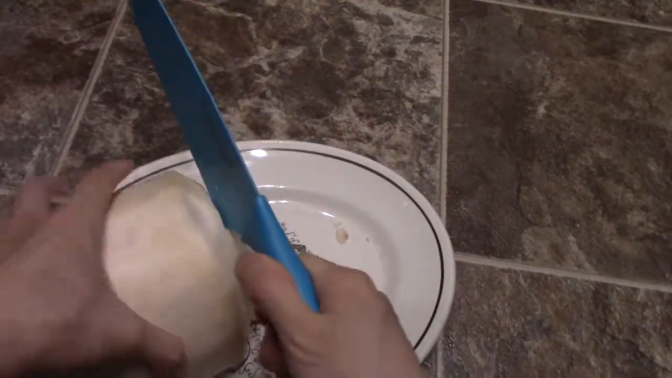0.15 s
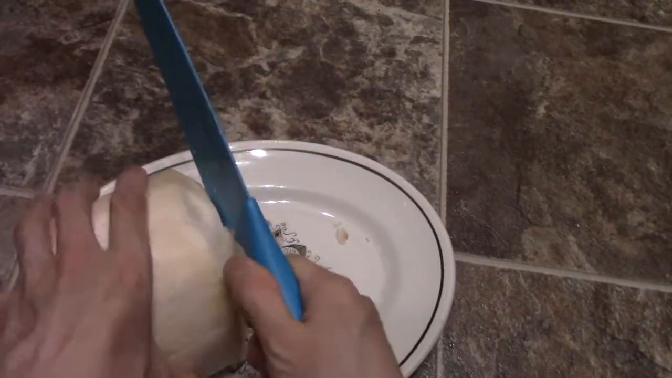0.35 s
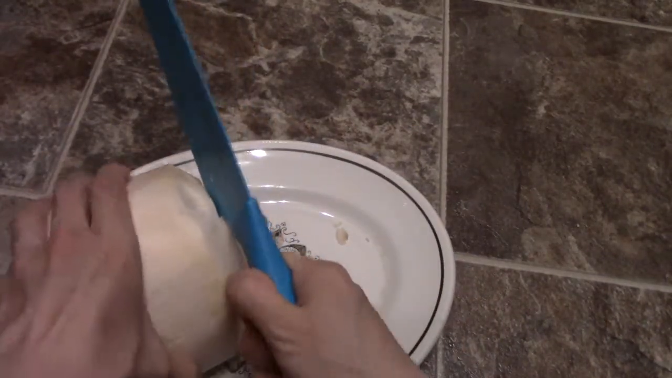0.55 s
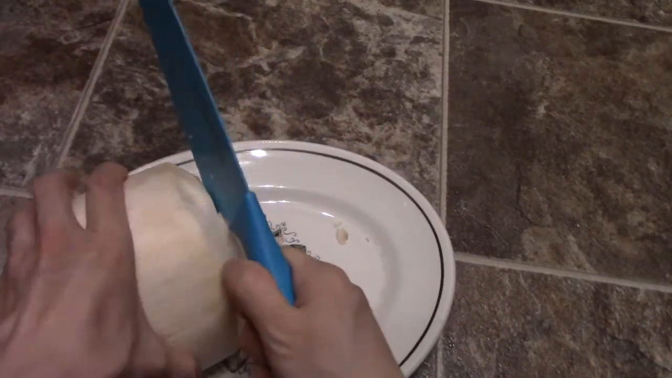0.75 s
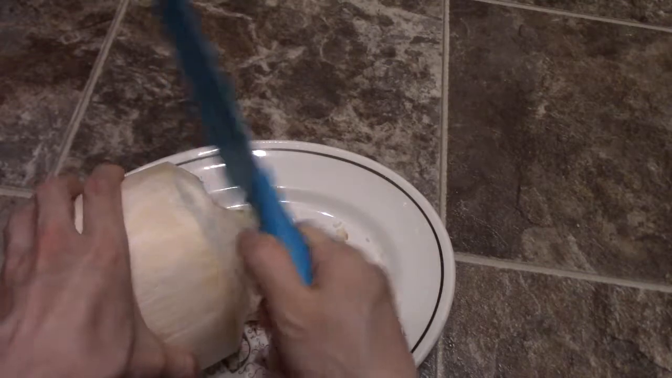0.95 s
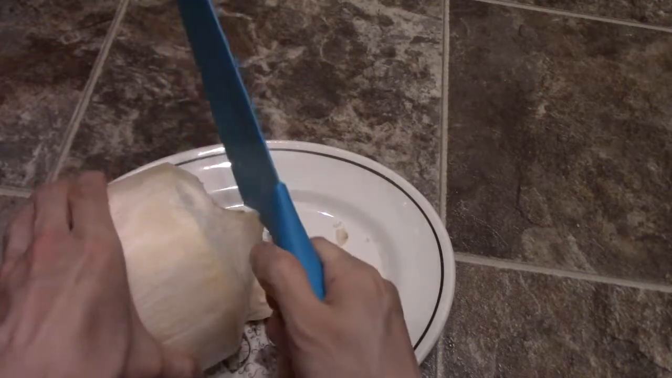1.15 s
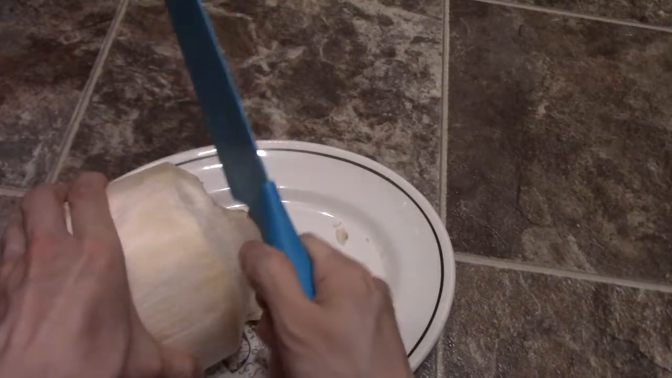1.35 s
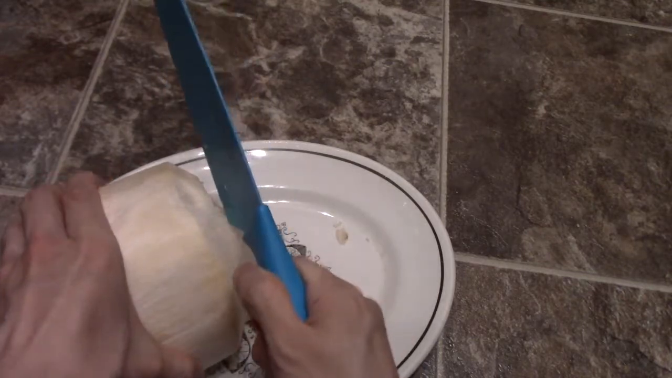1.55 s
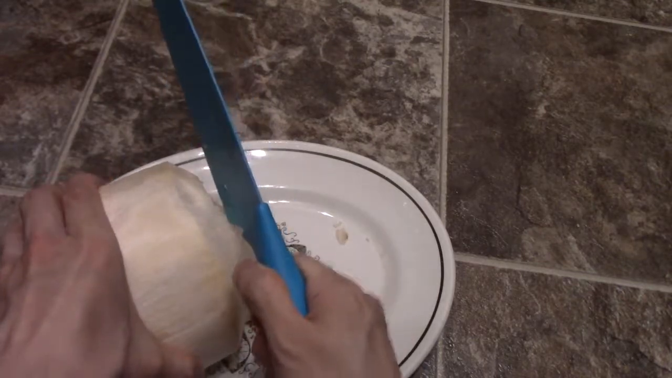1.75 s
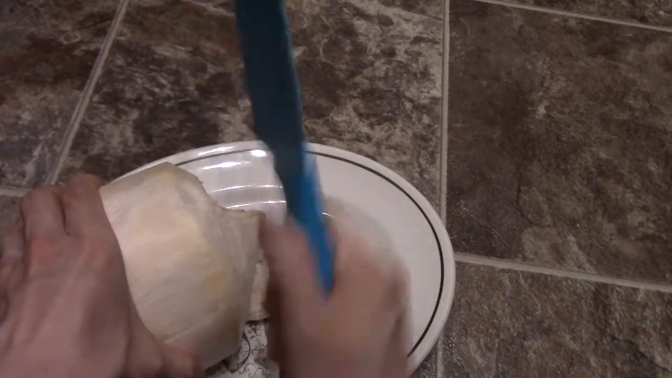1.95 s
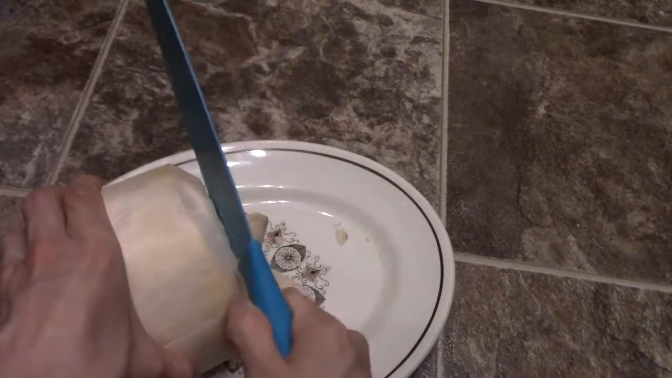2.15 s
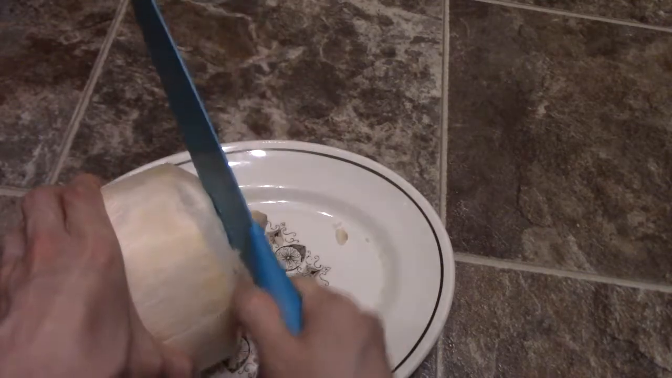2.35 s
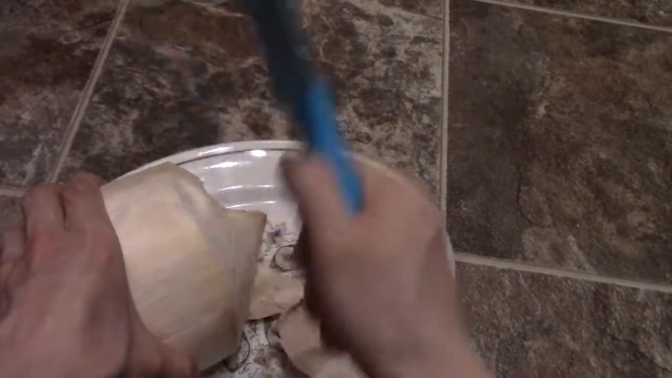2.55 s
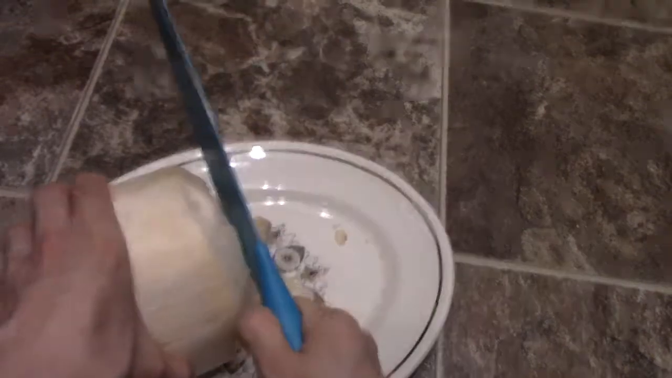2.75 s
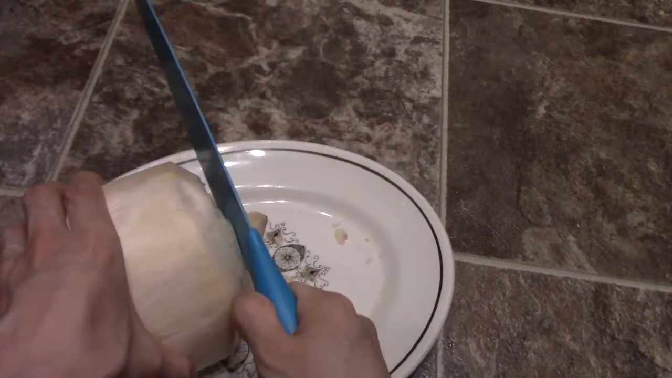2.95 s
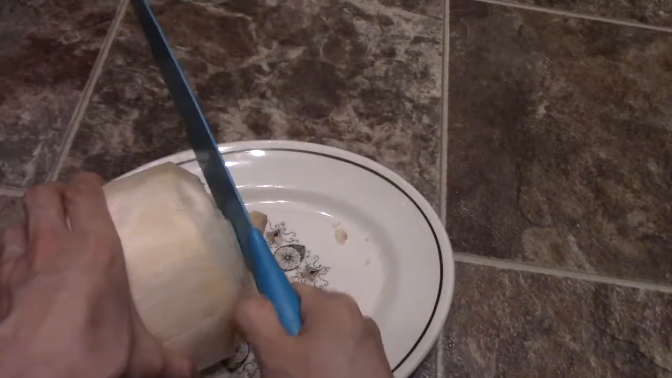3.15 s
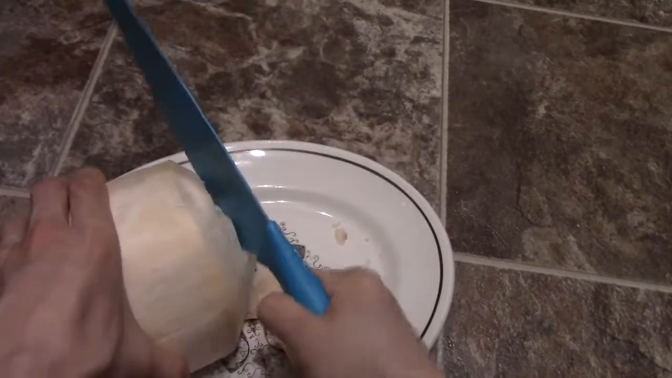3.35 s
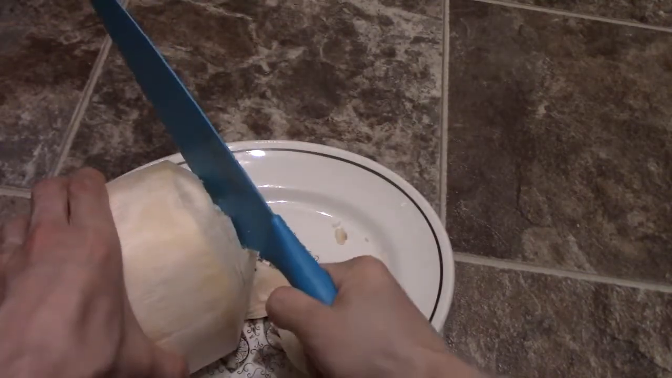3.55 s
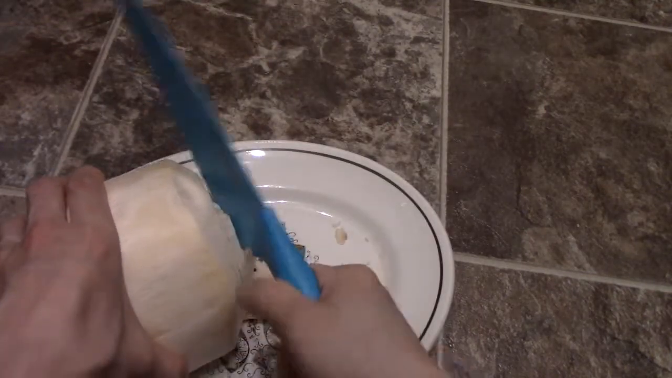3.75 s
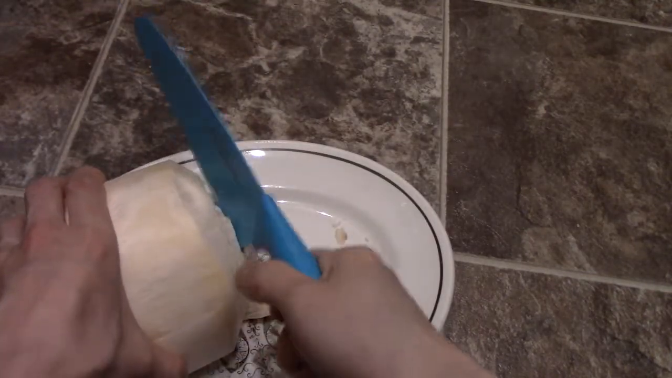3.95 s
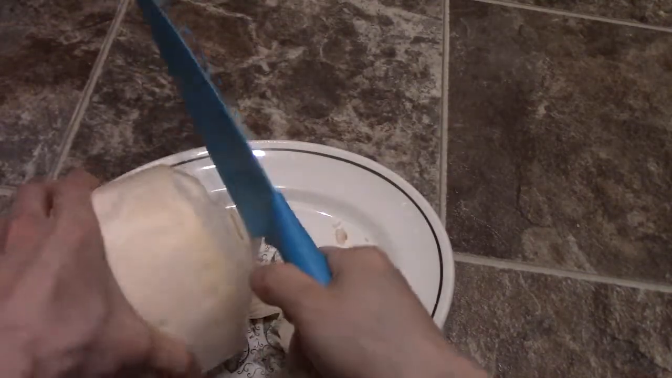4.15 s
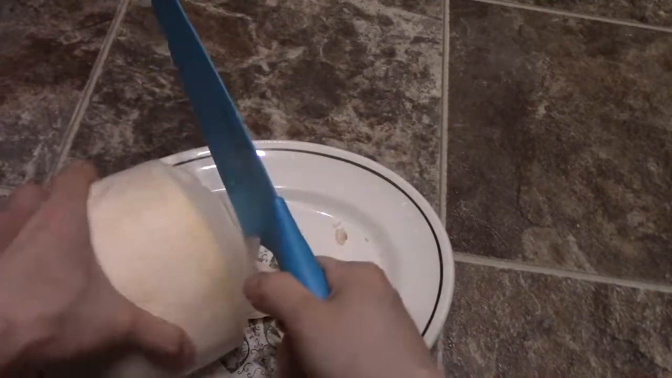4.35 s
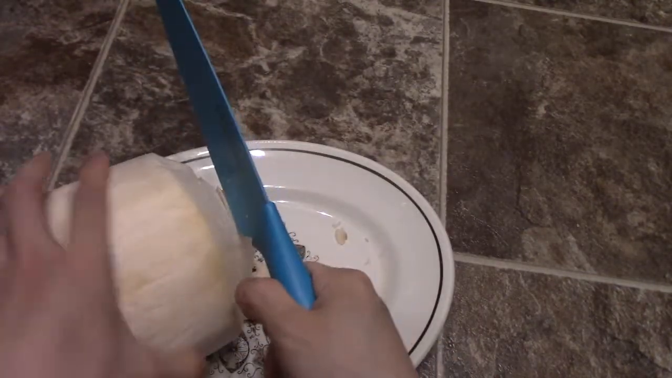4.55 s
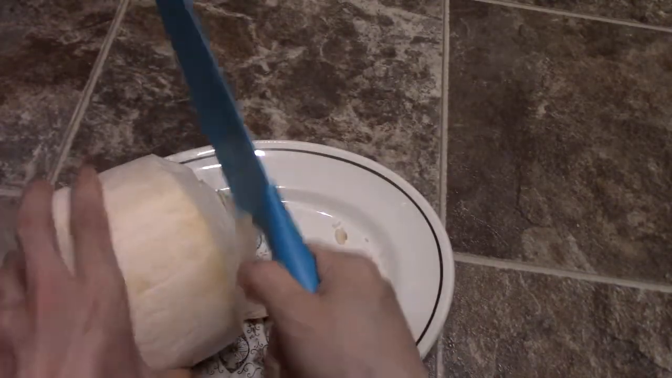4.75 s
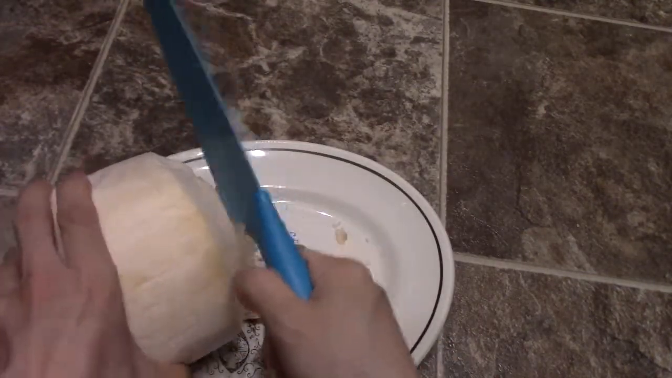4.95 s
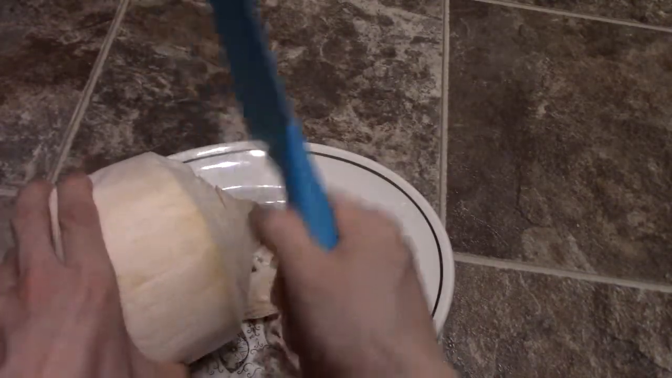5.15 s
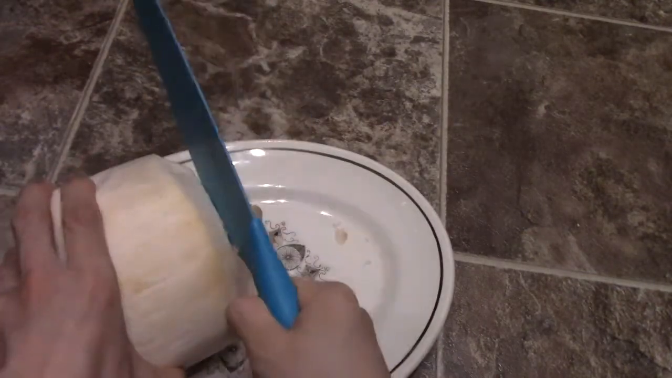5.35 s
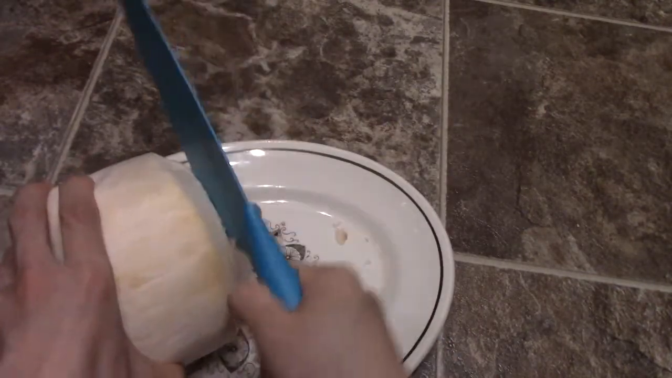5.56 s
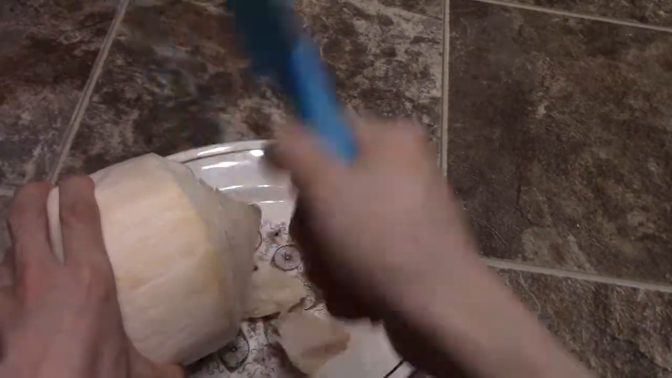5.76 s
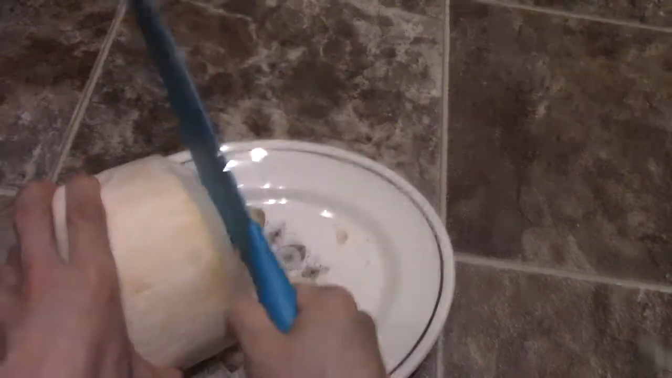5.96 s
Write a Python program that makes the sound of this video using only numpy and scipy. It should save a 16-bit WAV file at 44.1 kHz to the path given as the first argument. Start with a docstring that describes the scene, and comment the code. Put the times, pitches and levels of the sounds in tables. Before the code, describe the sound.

Close up in a kitchen, faint rubs and a tiny snap precede two hard, crunchy chops into a coconut, with low floor thump and slight plate clatter. The blade is then worked loose with dry snaps, rustling fibres and soft bumps. Two heavier chops follow, and a brief rub swells at the end. A low appliance hum and airflow run throughout.

```python
"""Close stereo take of a kitchen: a knife opens a young coconut held on a plate on a tiled floor. First small
rubs, bumps and fibre snaps near the camera, over an appliance's steady tones and airflow noise. Near 2.0 s and
2.7 s come two chops: shaped noise bursts for torn husk and clacking plate, decaying sines for floor, nut and
plate. Then the blade is worked loose: short resonant bursts snap and grains of noise rustle under each stroke.
Two more chops land near 5.2 s and 5.9 s; the blows drive the limiter, and a rub swells at the very end."""
import sys
import numpy as np
from scipy import signal
from scipy.fft import rfft, irfft, next_fast_len
from scipy.io import wavfile
from scipy.ndimage import uniform_filter1d, minimum_filter1d

SR = 44100
rng = np.random.default_rng(int(sys.argv[2]) if len(sys.argv) > 2 else 0)


def unload_wav(signal):
    """Save mono or channel-first audio to the path in sys.argv[1] as 16-bit WAV at rate SR, clipped to [-1, 1]."""
    wavfile.write(
        sys.argv[1],
        SR,
        np.round(np.clip(np.atleast_2d(signal).T, -1, 1) * 32767).astype(np.int16),
    )


N = 268569

# Nut driven onto the plate, or bouncing; gains of each body's modes:
# [t/s, floor boom level/dB, nut level/dB, hollow level/dB, plate clatter level/dB, rim ring level/dB]
THUDS = [(1.963, -15.5, -3.5, -16.5, -35, -46), (1.9735, -4.5, -19, -11, -33, -33.5),
         (2.678, -7.5, -3, -20, -26.5, -46), (2.689, -3, -18, -14.5, -35, -33),
         (5.22, -8.5, 4.5, -10, -21, -43), (5.243, -9, 0.5, -7, -30.5, -30),
         (5.865, -3, 8, -1.5, -19.5, -46), (5.889, -10, -12, -4, -19.5, -22.5)]
# Modes of the struck bodies, each table: [f/Hz, level/dB relative, t60/s]
FLOOR_MODES = [(74, -10, .12), (86, -14, .2), (97, 5, .2), (121.6, -11, .2), (139, 3, .22)]
NUT_MODES = [(165.75, -1, 0.25), (195, -16, 0.22)]
HOLLOW_MODES = [(244.3, -6, 0.14), (266.7, -5, 0.072), (307.4, 7, 0.1), (369, -2.5, 0.24),
                (407.3, -12.5, 0.22), (437, 5, 0.13), (475.2, -3, 0.12), (538.3, -8.5, 0.18),
                (591, -5, 0.061), (643, -21.5, 0.14), (786, -16, 0.087)]
PLATE_MODES = [(1005, -1.5, 0.13), (1274, -7, 0.13), (1350, -12, 0.085), (1558, -2, 0.08), (1644, -5, 0.3),
               (1889, -7, 0.13), (2210, -1, .1), (2630, -6, .13), (3000, -10.5, .15), (9200, -21.5, .15)]
RIM_MODES = [(1217, -6, .4), (1459, -9, .3), (1957, -1, .18), (2030, 5, .35), (2100, 1, .2)]
# Blade tearing into the husk, and a few dull clacks of the plate: [t/s, level/dB, rise/s, t60/s, tilt/dB per
# octave]
CRACKS = [(1.9575, -12, 0.002, 0.03, 2), (1.9684, -19.5, 0.00036, 0.047, -3.5),
          (1.984, -17, 0.0012, 0.013, -4), (1.991, -16.5, 0.00073, 0.015, -7),
          (2.6704, -13, 0.00022, 0.072, -1.5), (2.6752, -6.5, 0.00026, 0.029, 4.5),
          (2.684, -26, 0.0023, 0.026, -14), (2.715, -24.5, 0.0018, 0.06, -4.5),
          (5.214, -8, 0.0045, 0.018, -0.5), (5.2425, -12, 0.00093, 0.094, -7.5),
          (5.29, -26, 0.0038, 0.059, -9.5), (5.8585, -3.5, 0.0056, 0.015, 0),
          (5.889, -4, 0.0016, 0.029, -6.5), (5.905, -7.5, 0.0032, 0.017, -5.5),
          (5.938, -21.5, 0.0017, 0.12, -8.5)]
# Spectrum of tearing husk before the tilt: [f/Hz, level/dB per Hz, relative]
HUSK_SPECTRUM = [(290, -50), (500, -4.5), (868, 0), (1930, 6), (6330, -6), (7000, -0.5), (7980, -3.5),
                 (10700, -5.5), (13300, -18.5), (14900, -13.5), (16000, -51.5)]
# Loudest fibre snaps and blade ticks, peaks before the resonances:
# [t/s, peak level/dB, dull part level/dB relative to the bright part]
SNAPS = [(0.2601, -39, 2), (0.5012, -49, -8), (0.8259, -49, -9), (1.4969, -52, -4), (1.91, -50, -10),
         (2.2512, -51, -17), (2.2946, -43, -15), (2.306, -36.5, -27), (2.335, -41, -11), (2.38, -41, -10),
         (3.1234, -50, 9), (3.208, -42, -17), (3.252, -41, -16), (3.272, -17.5, -10.5),
         (3.3275, -40.5, -20), (3.4098, -31, -7), (3.4185, -32, -9), (3.4284, -32, -4), (3.4929, -42, -21),
         (3.5074, -45, -22), (3.65, -29, 3.5), (3.7218, -45, -8), (3.901, -44.5, -18), (4.072, -41, -1),
         (4.9046, -36.5, -14), (4.9311, -50.5, -7), (5.397, -49, 1), (5.4613, -50, 11.5),
         (5.5183, -42.5, -9), (6.016, -43, 6)]
# Resonances of a snap's bright and dull parts: [f/Hz, width of each of two passes/Hz, level/dB]
BRIGHT_RESONANCES = [(7400, 1200, -4), (9130, 3400, 10.5), (9700, 5300, -11), (13500, 4800, -6)]
DULL_RESONANCES = [(1500, 730, 5.7), (2750, 790, 15.4), (4210, 950, 5.8)]
# Strokes of hand and blade over the husk: [loudest at t/s, level/dB, swell/s, fade/s]
STROKES = [(.2, -63, .25, .1), (.236, -55, .03, 0.1), (.262, -54.5, .08, 0.041), (.36, -62, .08, .2),
           (.82, -61, .08, .05), (2.36, -57, 0.064, 0.084), (3.15, -63, .12, 0.13), (3.25, -54, 0.14, 0.12),
           (3.73, -56, 0.31, 0.14), (3.895, -60, .07, 0.074), (4.035, -54.5, 0.12, 0.13),
           (4.075, -47.5, 0.017, 0.035), (4.17, -57.5, .1, 0.15), (4.3, -60, 0.13, 0.11),
           (4.39, -63.5, 0.13, 0.18), (5.467, -53, 0.036, 0.035), (5.55, -55.5, .13, 0.097),
           (6.09, -36.5, 0.029, .05)]
# Spectrum of the rubbing: [f/Hz, level/dB per Hz, relative]
RUB_SPECTRUM = [(1470, -25.5), (2500, 3.5), (3380, -8), (3920, -4), (6350, -2.5), (8940, -5.5),
                (14600, -12.5), (16000, -34)]
# Nut rocking on the plate: [t/s, level/dB, t60/s]
BUMPS = [(0.264, -40, 0.21), (1.514, -42, 0.25), (2.23, -42, 0.29), (4.086, -25, 0.095), (4.924, -23, 0.12)]
# Faint clinks of blade or plate: [t/s, level/dB, f/Hz, t60/s]
CLINKS = [(.234, -40, 2140, 0.074), (.263, -46.5, 3860, 0.059), (1.43, -52, 4200, .05),
          (3.722, -47, 4030, 0.061), (4.077, -42.5, 1800, 0.065), (4.906, -49, 3810, 0.081)]
# Side channel against mid, before any offset for the source's place: [f/Hz, level/dB]
SIDE_SPECTRUM = [(60, -36.5), (180, -17.5), (550, -24), (1650, -13.5), (4970, -10), (15000, -10.5)]
# Decay of the kitchen: [f/Hz, t60/s]
ROOM_DECAY = [(300, 0.4), (1000, 0.34), (2500, 0.27), (5000, 0.32), (9000, 0.085), (15000, 0.047)]
# Steady tones of the appliance: [f/Hz, rms level before waver/dB, waver/dB]
HUM = [(119, -58, 0.5), (131, -54.5, 4), (261, -46.5, 2), (530, -58, 3), (665, -77, 10.5),
       (967, -65.5, 0.5), (2003, -71.5, 3.5), (5770, -74, 0)]
# Resonances in the appliance's airflow: [f/Hz, width of each of two passes/Hz, rms level/dB]
DUCT = [(188.8, 28, -59.5), (324.7, 14, -56.5), (382, 6.9, -65), (465, 62, -53.5), (988, 40, -68),
        (1260, 58, -67.5), (1479, 50, -69.5), (1695, 120, -68), (5630, 1200, -73.5), (9020, 150, -83.5)]
# Spectrum of the appliance's broad wash: [f/Hz, level/dB per Hz, relative]
WASH_SPECTRUM = [(18, -58), (30, -29), (70, -23), (112, -17.5), (174, -16), (266, -4.5), (364, -9),
                 (461, -5.5), (721, -19.5), (988, -17), (1160, -21), (4420, -37.5), (5740, -40.5),
                 (11400, -48.5), (16000, -92.5)]


def amp(db):
    """Turns decibels into gain."""
    return 10 ** (np.asarray(db) / 20)


def evened(x):
    """Scales a sound to rms 1."""
    return x / np.sqrt(np.mean(x ** 2) + 1e-20)


def read(points, hz):
    """Reads a spectrum table on a log-frequency axis."""
    f, value = np.transpose(points)
    return np.interp(np.log(hz + 1), np.log(f + 1), value)


def add(mix, s, sound):
    """Mixes a sound in at time s, cut where the mix ends."""
    part = mix[round(s * SR):][:len(sound)]
    part += sound[:len(part)]


def coloured(x, db_at):
    """Filters x by a gain in dB given as a function of frequency."""
    size = next_fast_len(x.shape[-1])
    gain = amp(db_at(np.fft.rfftfreq(size, 1 / SR)))
    return irfft(rfft(x, size) * gain, size)[..., :x.shape[-1]]


def resonate_twice(x, hz, width):
    """Passes x twice through one resonance of gain 1 at its centre."""
    b, a = signal.iirpeak(hz, hz / width, SR)
    return signal.lfilter(b, a, signal.lfilter(b, a, x))


def drift(rate):
    """Slow chance: lines between normal random values, rate of them per second."""
    knots = rng.standard_normal(4000)
    return np.interp(np.arange(N) / SR * rate, np.arange(len(knots)), knots)


def ring(modes, rise):
    """Dying sines of a struck body; a heavy body takes a moment to start."""
    t = np.arange(SR // 2) / SR
    tones = sum(amp(db - 60 * t / t60) * np.sin(2 * np.pi * hz * t) for hz, db, t60 in modes)
    return tones * (1 - np.exp(-t / rise))


def thuds():
    """Each blow rings the bodies in its own proportions; nut and plate chatter, roughening their upper rings."""
    out, t = np.zeros(N), np.arange(SR // 10) / SR
    upper = ring(HOLLOW_MODES, 0.0035), ring(PLATE_MODES, 0.0019)
    floor, nut = -ring(FLOOR_MODES, 0.018), -ring(NUT_MODES, 0.001)
    rim = ring(RIM_MODES, 0.002)
    for s, *levels_db in THUDS:
        chatter = rng.standard_normal(len(t)) * amp(-60 * t / 0.14)
        chatter = chatter / np.linalg.norm(chatter)
        hollow, plate = [signal.fftconvolve(body, chatter)[:len(body)] for body in upper]
        # the rim buzzes on the tiles
        wobble_db = 2 * evened(uniform_filter1d(rng.standard_normal(len(rim)), size=900))
        bodies = np.array([floor, nut, hollow, plate, rim * amp(wobble_db)])
        add(out, s, amp(levels_db) @ bodies)
    return out


def cracks():
    """Gritty noise swells as the edge bites or the plate clacks, dies at once and leaves a trail of splitting
    fibres."""
    out, t = np.zeros(N), np.arange(SR // 5) / SR
    for s, db, rise, t60, tilt_db in CRACKS:
        fine, uneven, clumps = rng.standard_normal((3, len(t)))

        def husk_db(hz):
            return read(HUSK_SPECTRUM, hz) + tilt_db * np.log2((hz + 50) / 4000)
        grit = evened(coloured(fine * amp(2.5 * uneven), husk_db))
        bite = np.minimum(t / rise, 1) ** 2
        burst = amp(-60 * np.maximum(t - rise, 0) / t60)
        clumps_db = 3 * evened(uniform_filter1d(clumps, size=120))
        trail = amp(-22 - 60 * t / 0.24 + clumps_db)
        add(out, s, amp(db) * grit * bite * (burst + trail))
    return out


def snaps():
    """Millisecond bursts excite bright and dull resonances; faint ones crackle at random under the strokes."""
    rise_s, t60_s = 0.0013, 0.008
    crackle_per_s, crackle_db, crackle_dull_db = 45, 5, -1  # first level relative to the stroke
    bright, dull, t = np.zeros(N), np.zeros(N), np.arange(SR // 100) / SR
    shape = np.minimum(t / rise_s, 1) ** 2 * amp(-60 * t / t60_s)
    for s, db, dull_db in SNAPS:
        burst = rng.standard_normal(len(t)) * shape
        burst = burst / abs(burst).max()
        add(bright, s, amp(db) * burst)
        add(dull, s, amp(db + dull_db) * burst)
    chance, size, grit = rng.random(N), rng.standard_normal(N), rng.standard_normal(N)
    slips = (chance < crackle_per_s / SR) * amp(crackle_db + 2.5 * size) * strokes()
    crackle = grit * signal.oaconvolve(slips, shape)[:N]
    bright = bright + crackle
    dull = dull + amp(crackle_dull_db) * crackle
    out = np.zeros(N)
    for part, resonances in ((bright, BRIGHT_RESONANCES), (dull, DULL_RESONANCES)):
        for hz, width, db in resonances:
            out += amp(db) * resonate_twice(part, hz, width)
    return out


def rustle():
    """Dense tiny grains of noise under the strokes, and fibres fizzing on behind each snap."""
    fizz_db, fizz_t60_s = -28.5, 0.14  # level relative to the snap's peak
    grains = rng.standard_normal(N) * amp(1.6 * drift(60) + 2.6 * drift(550))
    level, t = strokes(), np.arange(SR // 2) / SR
    for s, db, _ in SNAPS:
        add(level, s, amp(db + fizz_db - 60 * t / fizz_t60_s))
    return level * evened(coloured(grains, lambda hz: read(RUB_SPECTRUM, hz)))


def strokes():
    """Rubbing level: each stroke swells and fades evenly in decibels."""
    range_db = 30  # climb over the swell time, fall over the fade time
    t, level = np.arange(N) / SR, np.zeros(N)
    for s, db, swell, fade in STROKES:
        away = np.maximum((s - t) / swell, (t - s) / fade)
        level += amp(db - range_db * away)
    return level


def bumps():
    """Soft low pushes of the nut and faint clinks, one short decaying sine each."""
    out, bump_hz = np.zeros(N), 85
    for s, db, t60 in BUMPS:
        add(out, s, ring([(bump_hz, db, t60)], 1 / bump_hz))
    for s, db, hz, t60 in CLINKS:
        add(out, s, ring([(hz, db, t60)], 1 / hz))
    return out


def nearby(x, side_db):
    """Hands, plate and tiles scatter a close sound a little differently into the two microphones."""
    t = np.arange(SR // 200) / SR
    scatter = rng.standard_normal(len(t)) * amp(-60 * t / 0.0052)
    scattered = signal.fftconvolve(x, scatter / np.linalg.norm(scatter))[:N]
    side = coloured(scattered, lambda hz: side_db + read(SIDE_SPECTRUM, hz))
    return np.array([x + side, x - side]) * amp([[0.4], [-0.4]])  # a little to the left


def room(x, side_db):
    """Sparse taps of random sign, each band dying at its own speed; the microphones share most of them."""
    taps = np.zeros((2, SR // 2))
    # one tap at a random place in every 20 samples
    at = np.arange(100, SR // 2 - 20, 20) + rng.integers(0, 20, (2, (SR // 2 - 101) // 20))
    np.put_along_axis(taps, at, rng.choice([-1., 1.], at.shape), 1)
    hz, t, bands = signal.stft(taps, SR, nperseg=128)
    decay = amp(-60 * t / read(ROOM_DECAY, hz)[:, None])
    mid, side = signal.istft(bands * decay, SR, nperseg=128)[1]
    side = coloured(side, lambda hz: side_db + read(SIDE_SPECTRUM, hz))
    response = np.array([mid + side, mid - side]) / np.linalg.norm(mid)
    return signal.fftconvolve(x[None], response, axes=1)[:, :N]


def airflow(noise):
    """Noise through narrow resonances plus a broad wash."""
    bands = sum(amp(db) * evened(resonate_twice(noise, hz, width)) for hz, width, db in DUCT)
    wash = evened(coloured(noise, lambda hz: read(WASH_SPECTRUM, hz)))
    return bands + amp(-43) * wash


def appliance():
    """Wavering motor tones and air noise behind the chopping, nearly alike in both microphones."""
    t, tones = np.arange(N) / SR, np.zeros(N)
    for hz, db, waver_db in HUM:
        level = np.sqrt(2) * amp(db + waver_db * drift(4.1))  # root 2: rms to peak
        tones += level * np.sin(2 * np.pi * (hz * t + rng.random()))
    mid_noise, side_noise = rng.standard_normal((2, N))
    side = coloured(airflow(side_noise), lambda hz: read(SIDE_SPECTRUM, hz))
    return tones + airflow(mid_noise) + np.array([side, -side])


def scene():
    """Chops and small blade sounds close by, the kitchen's answer and the appliance behind."""
    thud, chop, small = thuds(), cracks(), snaps() + rustle()
    near = nearby(chop + small, side_db=-9.5) + thud + bumps()
    sent = amp(-12) * chop + amp(-18) * thud + amp(-13.5) * small
    return near + room(sent, side_db=-6.5) + appliance()


def record(dry):
    """The microphone cuts the deep bass, a quick limiter holds the peaks; then the band limit."""
    low_cut = signal.butter(3, 68, "high", fs=SR, output="sos")
    heard = signal.sosfilt(low_cut, dry)
    heard = heard * amp([[0.12], [-0.12]])  # the left microphone is a touch more sensitive
    level_db = 20 * np.log10(abs(heard).max(0) + 1e-9)
    fall_db = np.arange(N) * 266.0 / SR  # the gain recovers at 266 dB per second
    envelope_db = np.maximum.accumulate(level_db + fall_db) - fall_db
    over_db = np.maximum(envelope_db + 1.2, 0)  # threshold at -1.2 dB
    ahead_db = -minimum_filter1d(-over_db, size=61)  # the gain starts to fall just before a peak
    held = heard / amp(uniform_filter1d(ahead_db, size=61))
    band = signal.firwin(511, 16500, window=("kaiser", 9), fs=SR)  # low-pass, edge in Hz
    return signal.oaconvolve(held, band[None], "same")


dry = scene()
out = record(dry)
unload_wav(out)
```